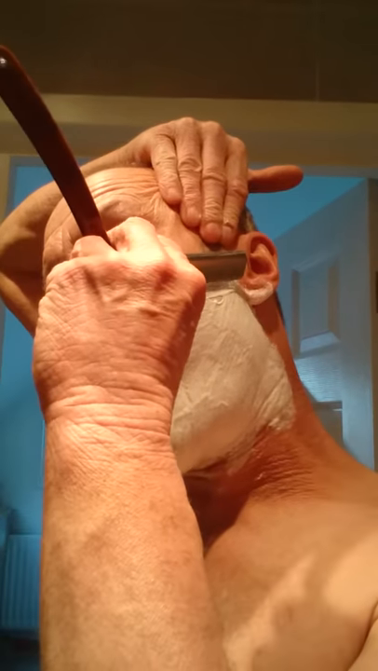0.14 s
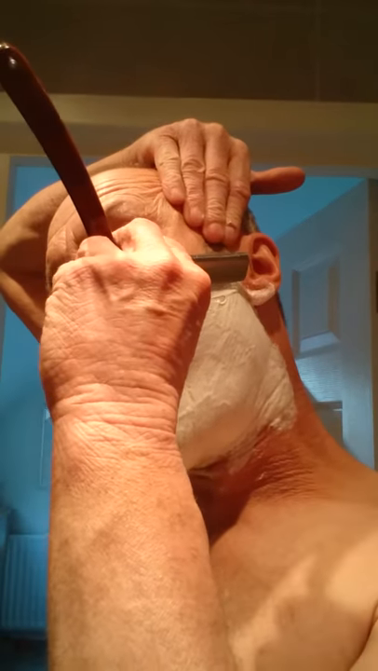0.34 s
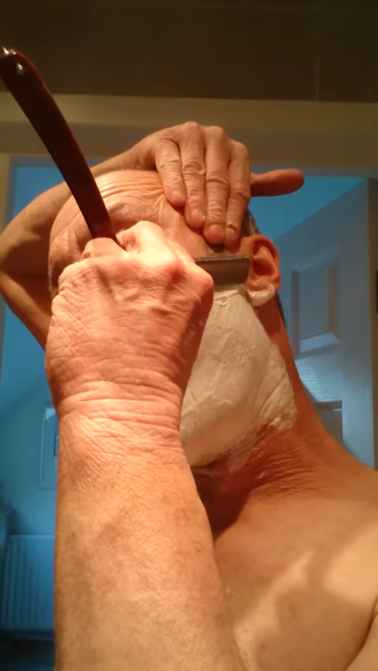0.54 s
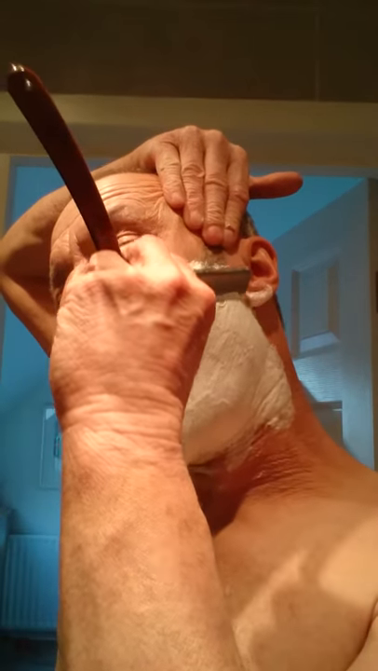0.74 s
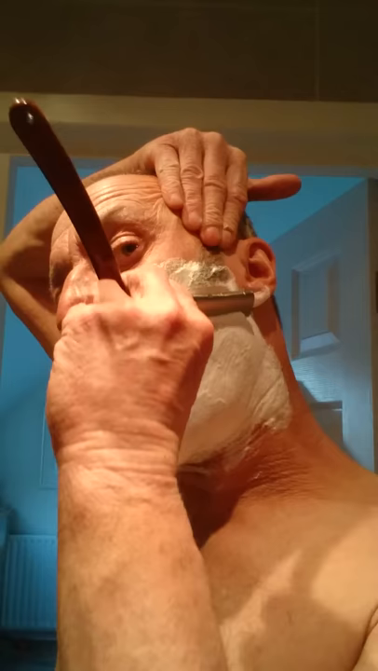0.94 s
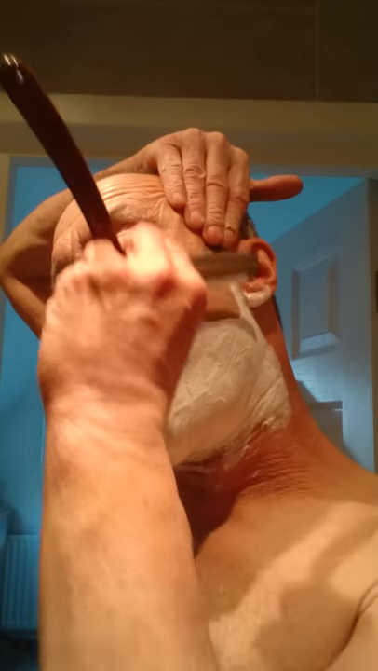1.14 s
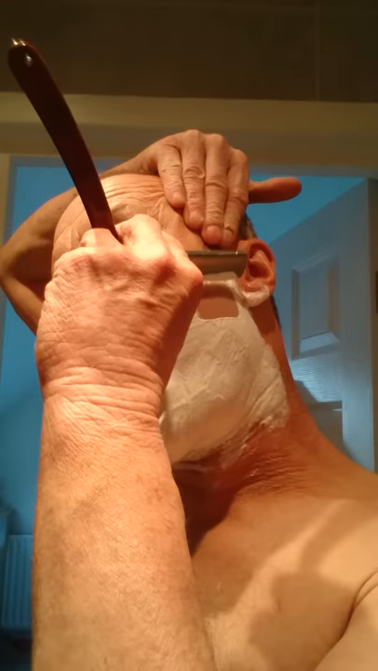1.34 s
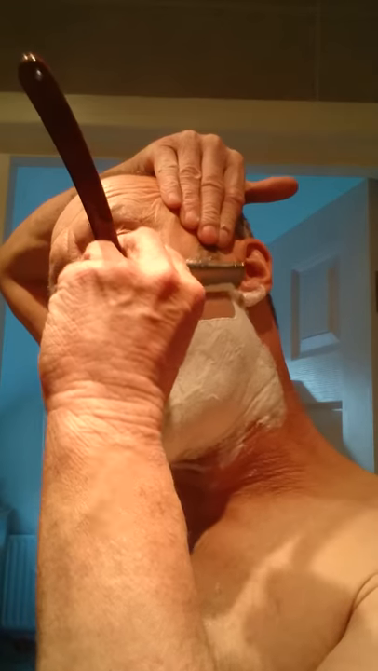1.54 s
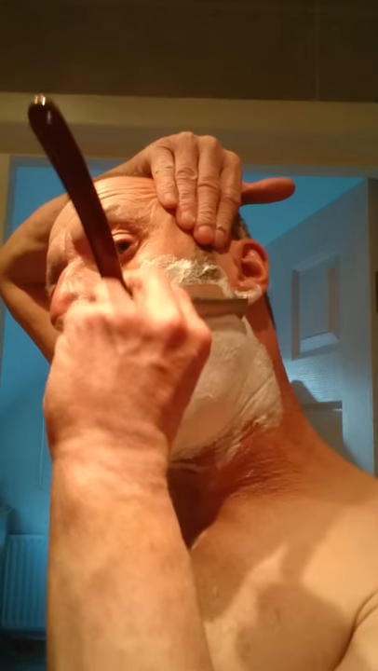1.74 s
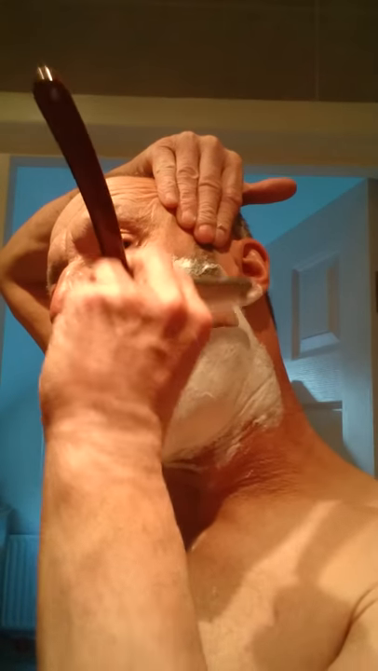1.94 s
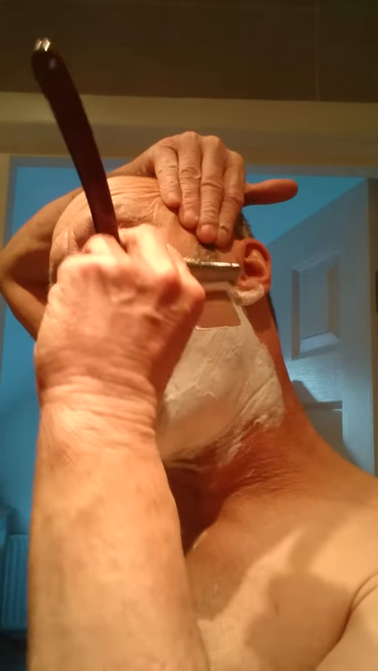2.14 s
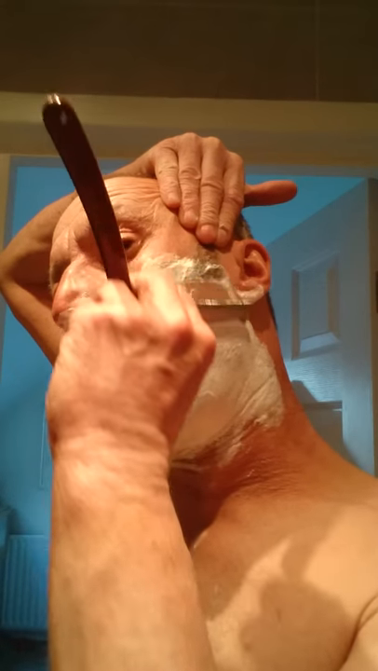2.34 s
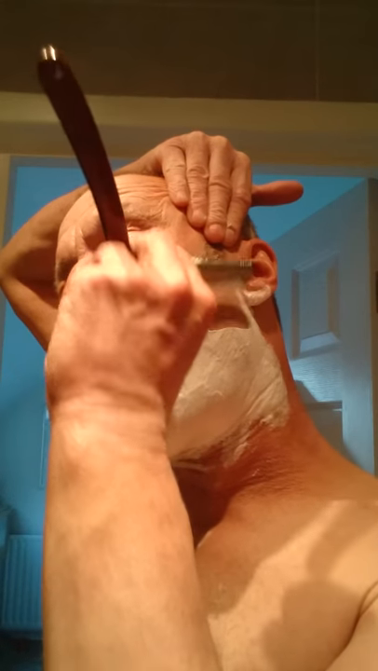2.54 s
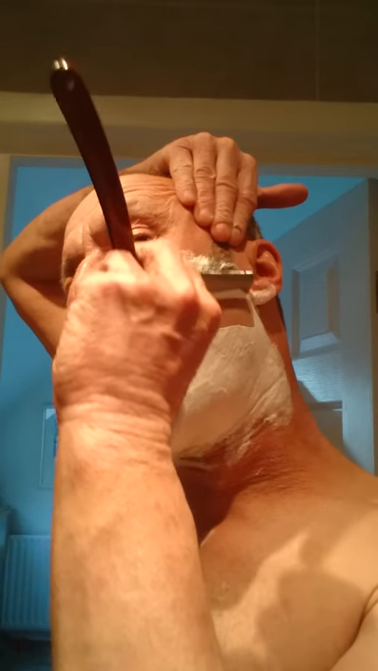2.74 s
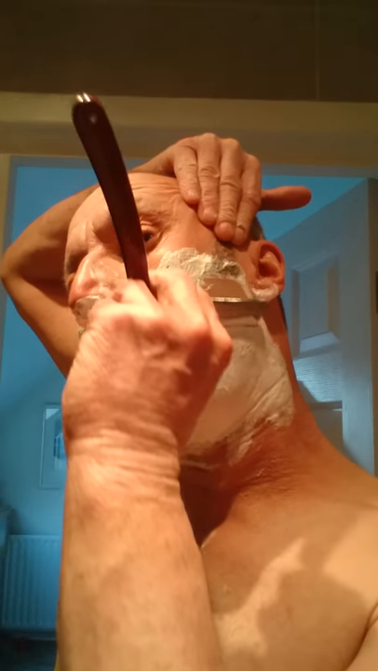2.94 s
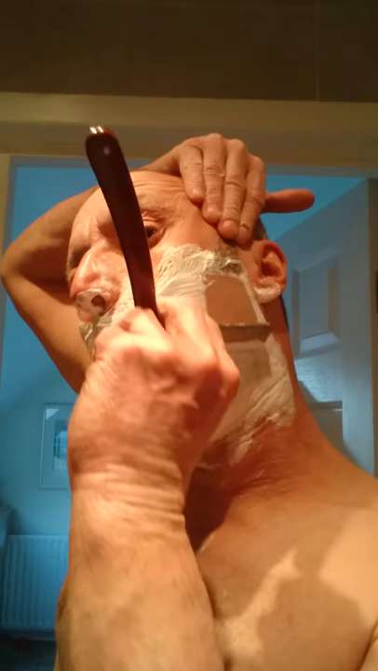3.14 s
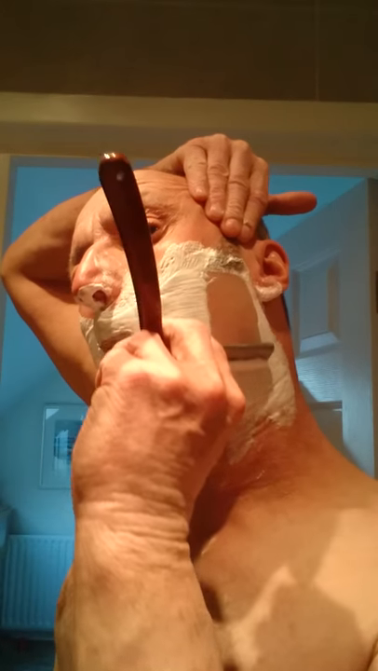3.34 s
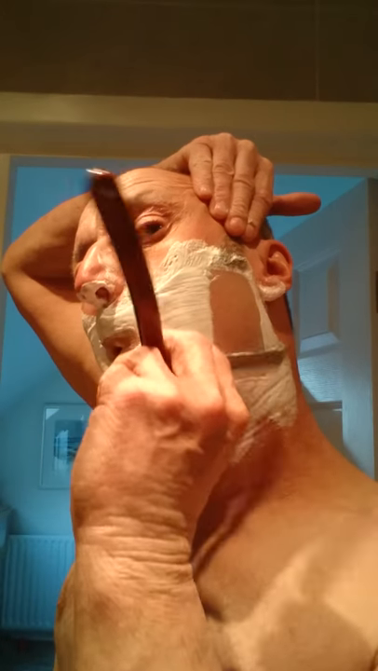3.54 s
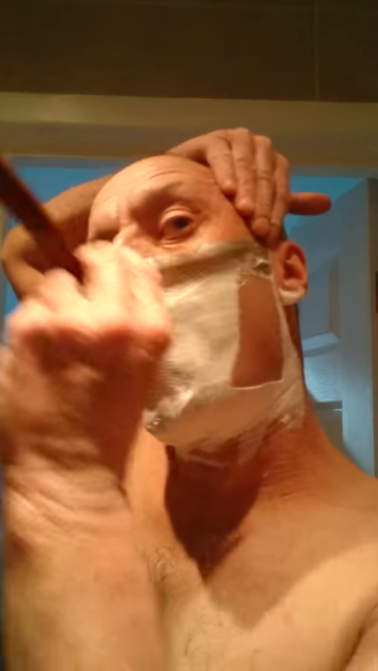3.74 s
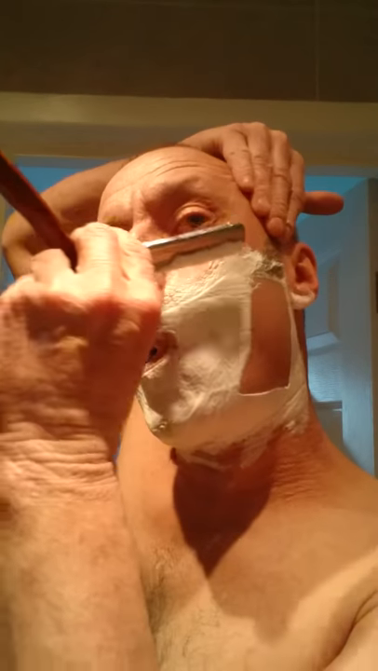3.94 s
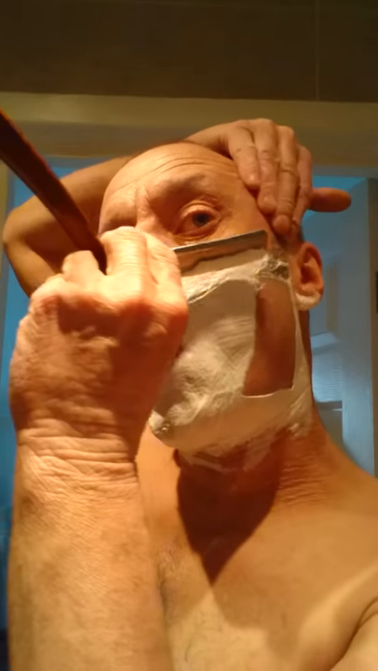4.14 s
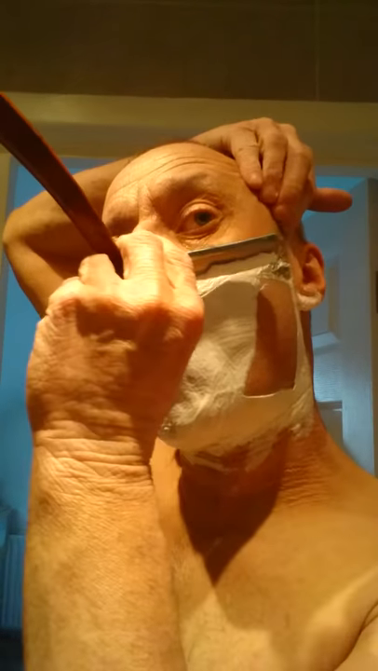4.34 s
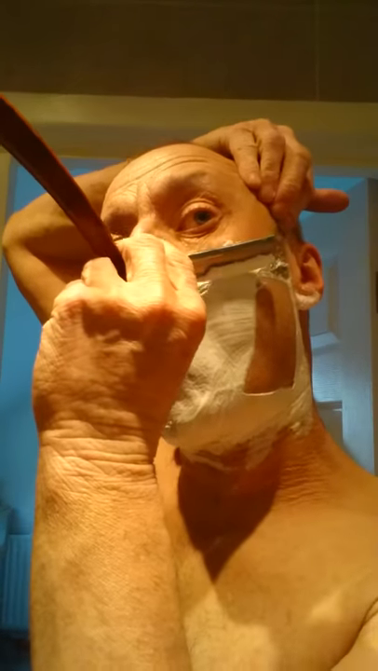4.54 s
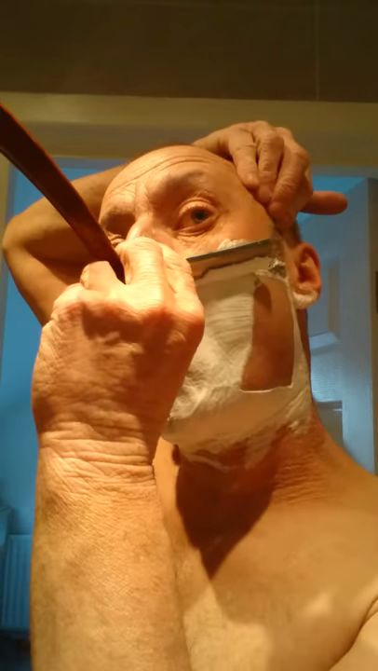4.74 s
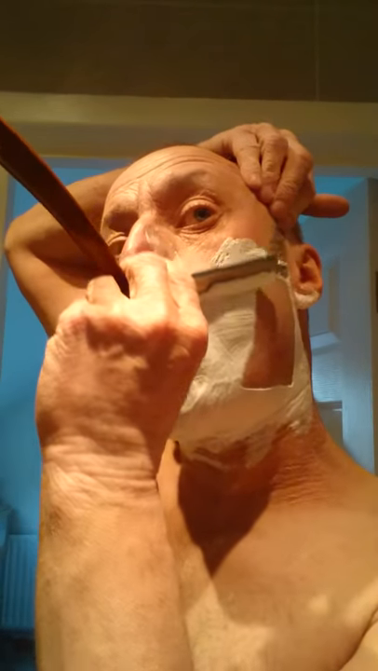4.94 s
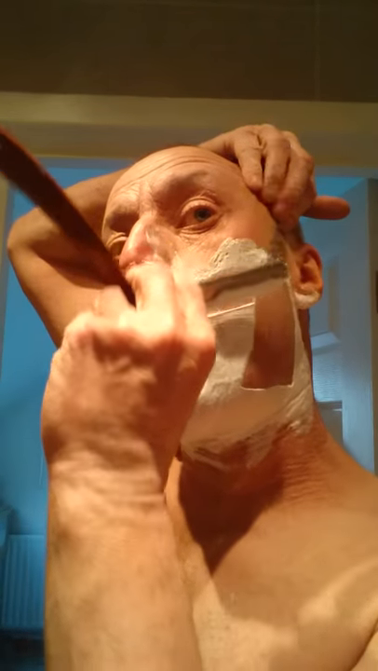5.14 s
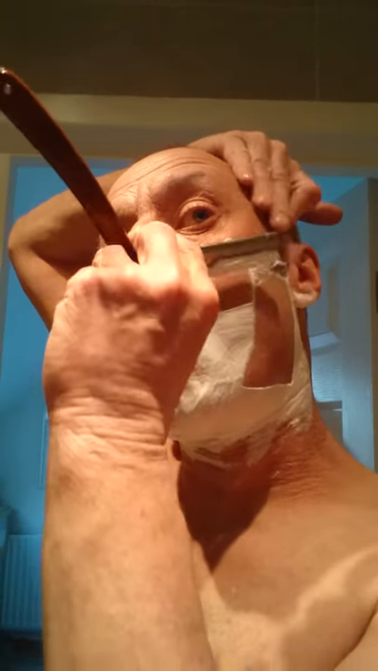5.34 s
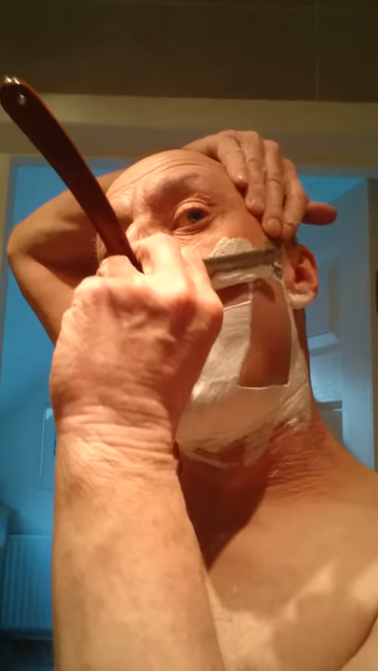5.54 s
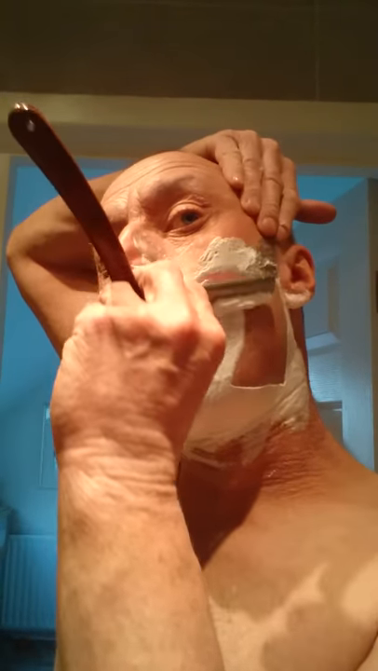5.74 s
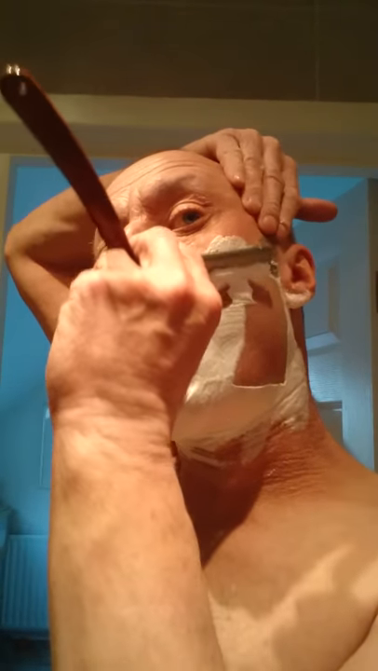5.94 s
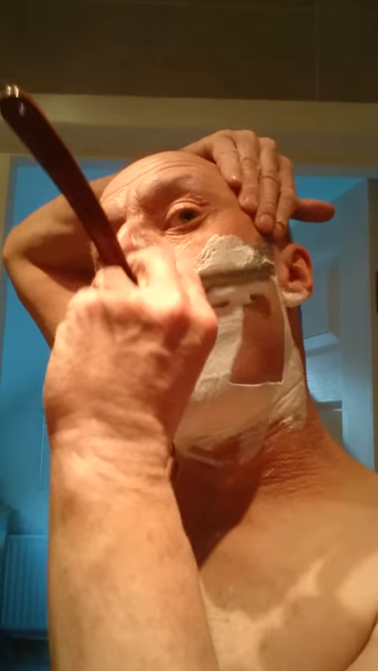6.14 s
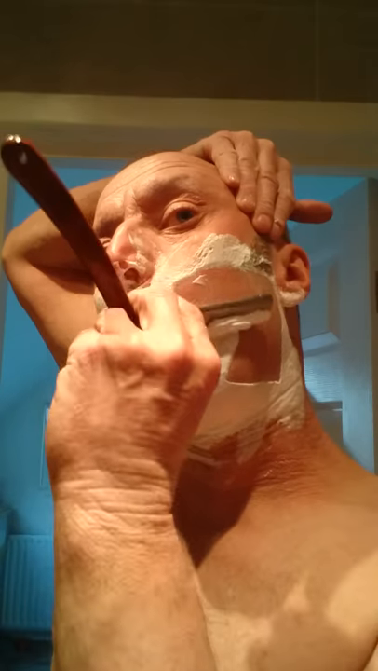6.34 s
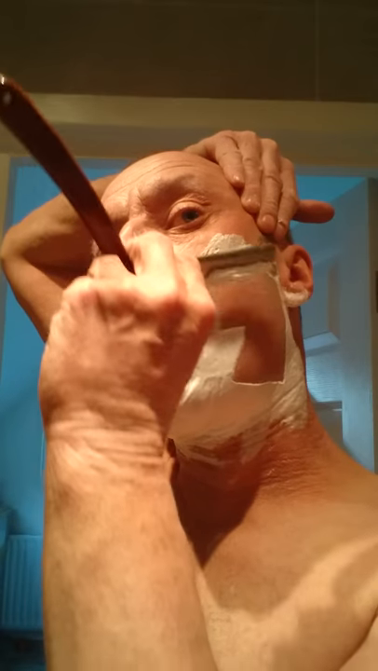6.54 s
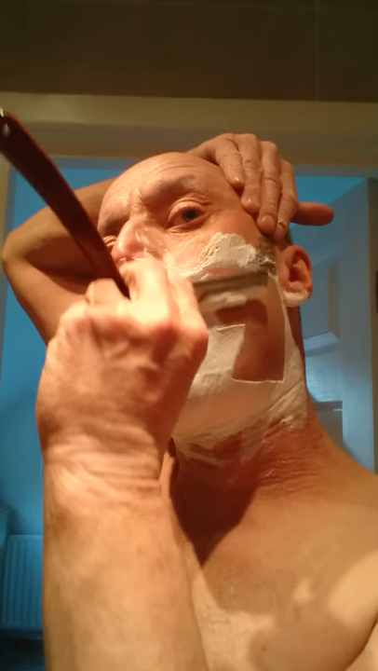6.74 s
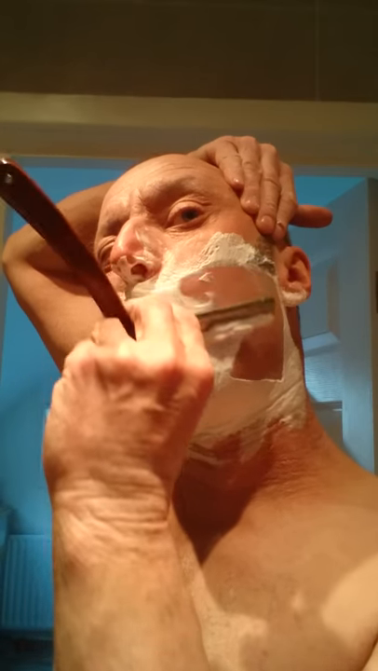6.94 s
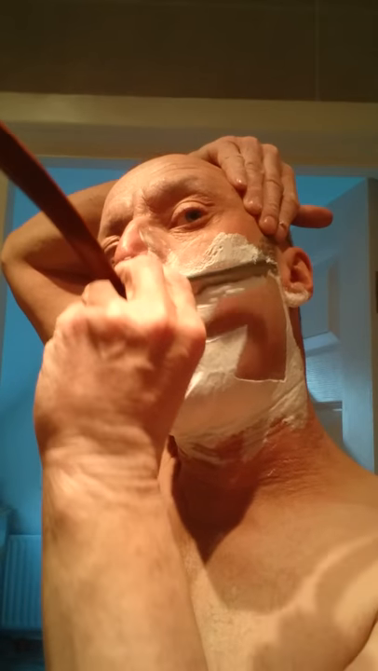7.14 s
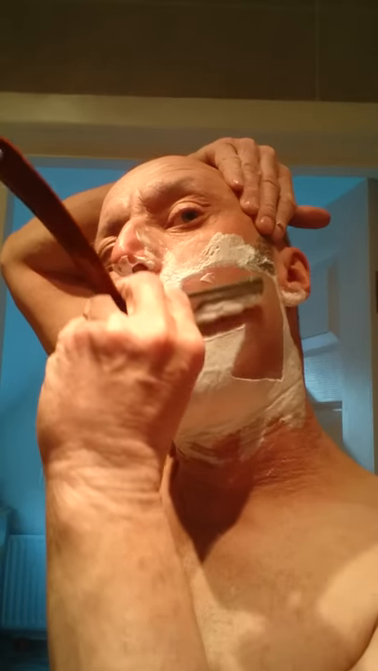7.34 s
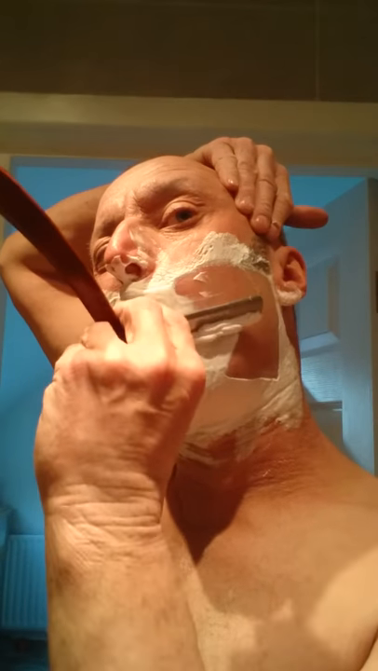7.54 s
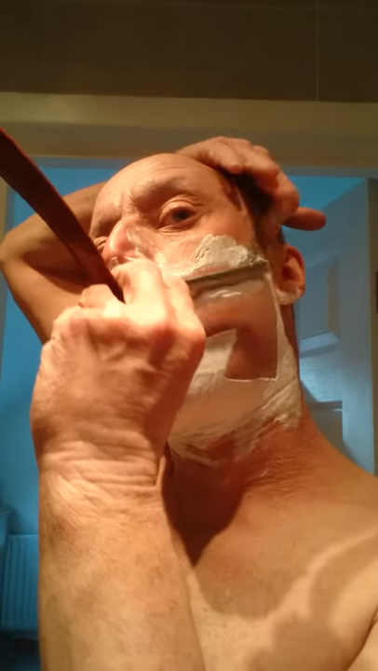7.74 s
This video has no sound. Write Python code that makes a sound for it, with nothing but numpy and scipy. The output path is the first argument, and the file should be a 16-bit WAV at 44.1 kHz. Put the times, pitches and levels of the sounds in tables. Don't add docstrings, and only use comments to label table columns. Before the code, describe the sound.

Close stereo sound of a straight-razor shave over a low, steady fan hum and airy room noise. Light rasps and sharp ticks come first, then stronger, longer scrapes, then a gap of almost only fan. Scraping returns in quick, uneven bursts, growing softer towards the end. The blade rings thin and hollow, crisp on the right and duller on the left, with short tile reflections.

```python
import sys
import numpy as np
from scipy import signal
from scipy.fft import rfft, irfft, next_fast_len
from scipy.io import wavfile

SR = 44100
rng = np.random.default_rng(int(sys.argv[2]) if len(sys.argv) > 2 else 0)


def undo_db(level):
    steps = np.asarray(level, float) / 20
    return 10 ** steps


def inscribe(sig):
    pcm = np.round(np.clip(np.atleast_2d(sig).T, -1, 1) * 32767)
    wavfile.write(sys.argv[1], SR, pcm.astype(np.int16))


N = 344344


def rms_one(x):
    return x / np.sqrt(np.mean(x ** 2) + 1e-20)


def at_hz(table, hz):
    table_hz, *columns = np.transpose(table)
    return np.array([np.interp(np.log(hz), np.log(table_hz), column) for column in columns])


def drift(rate_hz):
    pole = np.exp(-80 * np.pi * rate_hz / SR)
    noise = rng.standard_normal(N // 40 + 2002)
    slow = signal.lfilter([1], [1, -2 * pole, pole * pole], noise)[2000:]
    return np.interp(np.arange(N) / 40, np.arange(len(slow)), rms_one(slow))


# start_s, rise_s, hold_s, arrival_level_db, level_before_lifting_db
STROKES = [(0.593, 0.051, 0.13, -43.5, -49.5), (0.778, 0.041, 0.24, -43, -47),
           (1.098, .02, 0.024, -57, -70), (1.491, 0.12, 0.063, -37.5, -36.5),
           (1.663, 0.023, .2, -37, -42.5), (2.192, 0.029, 0.21, -35.5, -37),
           (2.716, 0.03, 0.073, -37.5, -40), (2.793, 0.051, 0.48, -38, -40), (3.289, 0.026, 0.26, -47, -41),
           (4.23, .03, .13, -70, -77), (4.816, 0.011, .04, -50, -54), (4.791, .12, 0.17, -40, -34),
           (4.997, 0.04, 0.14, -36.5, -43), (5.531, 0.024, 0.11, -51.5, -41),
           (5.632, 0.035, 0.12, -43, -42.5), (5.764, 0.037, 0.034, -39.5, -42.5),
           (5.84, .13, .015, -36, -50), (6.116, 0.028, .24, -40.5, -42.5), (6.37, .03, .055, -49.5, -56.5),
           (6.718, 0.014, 0.034, -52.5, -41.5), (6.75, 0.031, 0.23, -44, -42),
           (7.314, 0.038, 0.13, -46, -42.5), (7.456, 0.034, .125, -42.5, -55.5),
           (7.625, .016, .004, -49, -52)]


def stroke_pressure(t):
    swell_db, lift_db_per_s = 32, 387
    start, rise, hold, first_db, last_db = np.transpose(STROKES)[:, :, None]
    since_arrival = t - start - rise
    lift_db = lift_db_per_s * np.maximum(since_arrival - hold, 0)
    level_db = first_db + (last_db - first_db) * np.clip(since_arrival / hold, 0, 1)
    level_db += swell_db * np.minimum(since_arrival / rise, 0) - lift_db
    strongest = level_db.argmax(axis=0)[None]
    return level_db.max(axis=0), np.take_along_axis(lift_db, strongest, axis=0)[0]


# time_s, low_ring_db, upper_ring_db, top_db
GRIP = [(0.7, -20, -0.5, -17.5), (0.86, -10, 1, -7.5), (1.07, -20, -5, -15), (1.62, -15, -2.5, -11.5),
        (2.24, -19, -4.5, -17), (2.76, -14, -3, -16), (3.0, -21, -4.5, -17.5), (3.3, -22, -10, -17),
        (3.56, -12, -9.5, -13.5), (4.3, -10, -12, -2), (4.98, -7.5, -9.5, -16), (5.6, -3, -5.5, -16.5),
        (5.8, -5, -4.5, -14), (5.96, -7.5, -9, -23.5), (6.16, -5.5, -8, -18.5), (6.38, -0.5, -1, -10.5),
        (6.76, 0, -1, -12), (7.5, -0.5, 1, -11)]


def blade_grip(t):
    time_s, *columns = np.transpose(GRIP)
    return [np.interp(t, time_s, column) for column in columns]


def fine_hairs():
    hairs_per_s, uneven_db = 3400, 2.8
    cut = rng.random(N) < hairs_per_s * undo_db(1.5 * drift(40)) / SR
    size_db = uneven_db * np.minimum(rng.exponential(1, N), 3)
    return rms_one(cut * undo_db(size_db))


# time_s, peak_db, brightness_db
SNAPS = [(0.65, -26.5, -14), (0.693, -25, -6), (0.748, -25, -9), (1.055, -26.5, 0), (1.0817, -22.5, -4),
         (1.5406, -37, 4), (1.5733, -35, 4), (1.6302, -17.5, -2), (1.6905, -22, 4), (1.7048, -22, 3),
         (1.7178, -21.5, 4), (1.8024, -26, 8), (1.8344, -21.5, 1.5), (1.9042, -23.5, -7), (2.2061, -34, 7),
         (2.3233, -20, 6.5), (2.527, -30.5, -25), (3.067, -19, -5), (3.39, -27.5, 6), (3.57, -23.5, 2),
         (4.7911, -31, 0), (4.806, -29.5, -9), (4.8362, -26.5, -7), (4.863, -24, -11), (4.884, -23.5, 0),
         (5.5508, -30, -9), (6.1398, -27, 1), (6.4355, -31, -14), (7.6052, -33.5, -1), (7.646, -30, -1)]


def thick_hairs(level_db):
    random_per_s, above_rasp_db = 16, 13
    when, peak_db, bright_db = np.transpose(SNAPS)
    others = np.flatnonzero(rng.random(N) < random_per_s / SR)
    size, colour = rng.standard_normal((2, len(others)))
    at = np.r_[np.round(when * SR).astype(int), others]
    peak_db = np.r_[peak_db, level_db[others] + above_rasp_db + 3.0 * size]
    return at, peak_db, np.r_[bright_db, 4.0 * colour]


def blade_ring(level_db, lag_s):
    cepstrum = irfft(np.log(undo_db(level_db)))
    half = cepstrum.shape[1] // 2
    cepstrum[:, 1:half] *= 2
    cepstrum[:, half + 1:] = 0
    delay = np.exp(-1j * np.outer(lag_s, np.linspace(0, np.pi * SR, half + 1)))
    return irfft(np.exp(rfft(cepstrum)) * delay)[:, :half // 2]


def bathroom(x, wet_db):
    fade_60db_s, build_up_s = 0.2, 0.0019
    t = np.arange(int(.5 * SR)) / SR
    tail = rng.standard_normal((2, len(t))) * undo_db(-60 * t / fade_60db_s) * np.clip(t / build_up_s, 0, 1)
    tail = tail / np.sqrt(np.sum(tail ** 2, axis=1, keepdims=True))
    echoes = signal.fftconvolve(x, tail, axes=1)[:, :N]
    return x + undo_db(np.array(wet_db))[:, None] * echoes


# pitch_hz, left_db, right_db
EDGE = [(2600, -86, -84), (3067, -87.5, -74), (3600, -85.5, -71), (4290, -72.5, -64.5), (4850, -78.5, -72),
        (5560, -74.5, -75.5), (6700, -82, -79.5), (8330, -85.5, -86), (10040, -87.5, -90),
        (11100, -101, -93), (11700, -102.1, -89.5), (12600, -104.9, -90.5), (14600, -107.9, -95.5)]
BLADE_ZONES_HZ = [3080, 4230, 5600, 7020, 11800]
FOAM_HISS = [.5, .42, .42, .55, 1.0]


def razor():
    t = np.arange(N) / SR
    low_db, upper_db, top_db = blade_grip(t)
    level_db, lift_db = [np.interp(t, t[::16], column) for column in stroke_pressure(t[::16])]
    top_db = top_db - lift_db
    hairs = fine_hairs()
    at, peak_db, bright_db = thick_hairs(level_db)

    snap_low_db = low_db[at] - 3
    snap_upper_db = upper_db[at] - 7 + bright_db
    stroke_db = [low_db + 9.5, 0, upper_db + 7, (upper_db + top_db) / 2 + 12.5, top_db + 19.0]
    snap_db = [snap_low_db + 10, 0, snap_upper_db + 14, snap_upper_db + 13.0, snap_upper_db / 2 - 1.5]
    tear_s, tear_db = [0, .0007, .0016], [-3, -5, -8]

    hz = np.maximum(np.linspace(0, SR / 2, 1025), 20)
    edge_db = at_hz(EDGE, hz) - 90 * np.log2(np.clip(2900 / hz, 1, 2))
    shadow_lag_s, port_likeness = .00003, .7
    share = np.sign(rng.random(N) - .5) * undo_db(2.2 * rng.standard_normal(N))
    upright = rng.random(N) < (1 + port_likeness) / 2
    share = np.array([np.where(upright, share, -share), share])
    foam = rng.standard_normal((2, N))
    wander_db = [0.5 * drift(5) for _ in FOAM_HISS]

    out = np.zeros((2, N))
    for k, hiss in enumerate(FOAM_HISS):
        shift = 9973 * k
        grain = hairs * np.roll(share, shift, axis=1) + hiss * np.roll(foam, shift, axis=1)
        strikes = grain * undo_db(level_db + stroke_db[k] + wander_db[k]) / np.hypot(1, hiss)
        for lag_s, step_db in zip(tear_s, tear_db):
            lag = (lag_s * SR * rng.uniform(.7, 1.3, len(at))).astype(int)
            step = np.minimum(at + lag, N - 1)
            snap = undo_db(peak_db + 9.5 + step_db + snap_db[k])
            strikes[:, step] += (-1) ** k * snap * undo_db([[-4.0], [0]])
        weight = np.interp(np.log(hz), np.log(BLADE_ZONES_HZ), np.arange(len(FOAM_HISS)) == k)
        zone_db = edge_db + [[76], [79]] + 10 * np.log10(weight + 0.0023)
        out += signal.oaconvolve(strikes, blade_ring(zone_db, [shadow_lag_s, 0]), axes=1)[:, :N]
    return bathroom(out, wet_db=[0.0, -10.0])


# pitch_hz, left_db, right_db, left_lead_rad, waver_db
TONES = [
    (100.2, -70, -68, 2.49, .4),
    (200.3, -75.4, -74, -2.93, .6),
    (300.5, -64.8, -69.6, -1.39, 1.5),
    (400.7, -66.7, -55.9, -2.19, .7),
    (254, -79.6, -72.7, -1.57, 1.5),
    (508, -64.1, -64.5, -2.47, 1.5),
    (762, -74.1, -73.8, -1.34, 2.5),
    (1016, -65.4, -65.9, .31, 1.6),
    (1270, -77.3, -69.5, .23, 2.5),
]


def fan_tones():
    t, out = np.arange(N) / SR, np.zeros((2, N))
    for hz, left_db, right_db, lead, waver_db in TONES:
        phase = 2 * np.pi * (hz * t + rng.random())
        height = np.sqrt(2) * (1 + waver_db / 8.7 * drift(3.0))
        out[0] += height * undo_db(left_db) * np.sin(phase + lead)
        out[1] += height * undo_db(right_db) * np.sin(phase)
    return out


# pitch_hz, left_db_per_hz, right_db_per_hz, likeness_0_to_1
AIR = [(42, -98, -100.7, 0.79), (90.5, -94.5, -93.5, 0.63), (181, -94, -90.5, 0.85),
       (306, -88, -87.5, 0.61), (435, -87.5, -87.5, 0.95), (680, -92.5, -86.5, 0.63),
       (1098, -85.5, -85.5, 0.68), (1430, -95.5, -92.5, 0.32), (2217, -94.5, -89, 0.25),
       (4400, -100.1, -94, 0.9), (4800, -99.0, -100.2, 0.2), (7780, -107.2, -106.6, 0),
       (11340, -118.9, -118.4, 0), (14200, -113.8, -112.9, 0.2)]
# pitch_hz, lead_rad
LEAD = [(0, 1.5), (260, 3.5), (1890, 7.5), (2330, 8.5), (2840, 17), (3880, 17.5), (4740, 17), (5510, 17.5),
        (10200, 14.5), (11500, 13), (13400, 5), (15800, -8)]
# pitch_hz, width_hz, left_db,
# right_db
ROOM_MODES = [(45.4, 6.2, 6, 11), (82.3, 3.7, 14, 10), (169.2, 14, 9.5, 6.5), (252.8, 4.4, -4.5, -1.5),
              (321.8, 26, 7, -2), (378.4, 18, 0, 7.5), (381, 6, -0.5, 11), (605.6, 6.4, 5, 9.5),
              (662, 6, 0, 5), (785, 5.9, 9.5, 10), (862, 28, 6, 5), (1098, 14, 1, 5), (1142, 30, 5, 4),
              (1167, 33, -1.5, 7), (1964, 140, 4, 3), (2251, 46, 4, 7), (3030, 52, 7.5, 5),
              (3360, 16, 2, 9), (4080, 380, 0, 5), (5220, 160, 3.5, 3), (9000, 4200, 0.5, 0.5)]


def fan_air():
    size = next_fast_len(N)
    hz = np.maximum(np.arange(size // 2 + 1) * SR / size, 1)
    left_db, right_db, alike = at_hz(AIR, hz)
    level_db = np.array([left_db, right_db]) - 40 * np.log2(np.maximum(38 / hz, 1))
    for mode_hz, width_hz, *boost_db in ROOM_MODES:
        level_db += np.outer(boost_db, 1 / (1 + (2 * (hz - mode_hz) / width_hz) ** 4))
    shared, own = rfft(rng.standard_normal((2, size)))
    alike = np.clip(alike, 0, 1)
    lead = np.interp(hz, *np.transpose(LEAD))
    left = alike * shared * np.exp(1j * lead) + np.sqrt(1 - alike ** 2) * own
    air = irfft(undo_db(level_db) * np.array([left, shared]), size)[:, :N] * np.sqrt(SR / 2)
    return air * undo_db(0.22 * drift(0.4))


def scene():
    return razor() + undo_db(0.5) * fan_tones() + fan_air()


def roll_off(x):
    return signal.sosfilt(signal.butter(12, 16200, fs=SR, output="sos"), x)


def record(dry):
    top_cut = signal.ellip(12, .5, 60, 15780, fs=SR, output="sos")
    mix = signal.sosfilt(top_cut, dry)
    return roll_off(mix)


dry = scene()
out = record(dry)
inscribe(out)
```